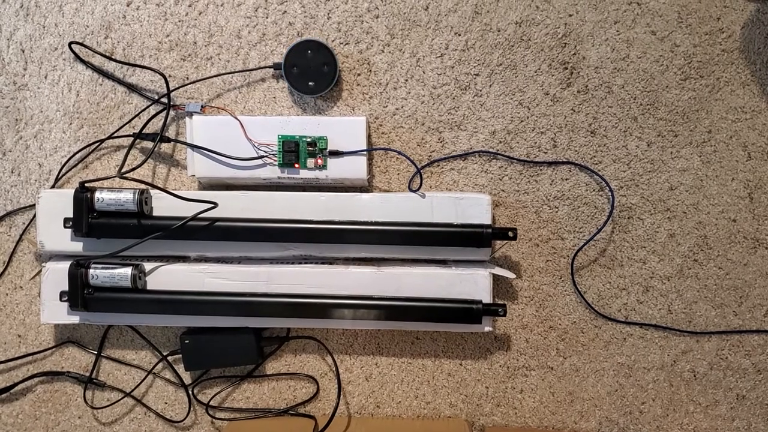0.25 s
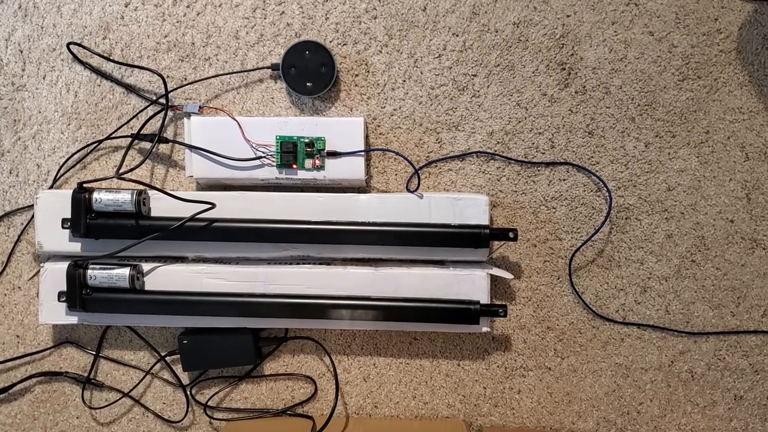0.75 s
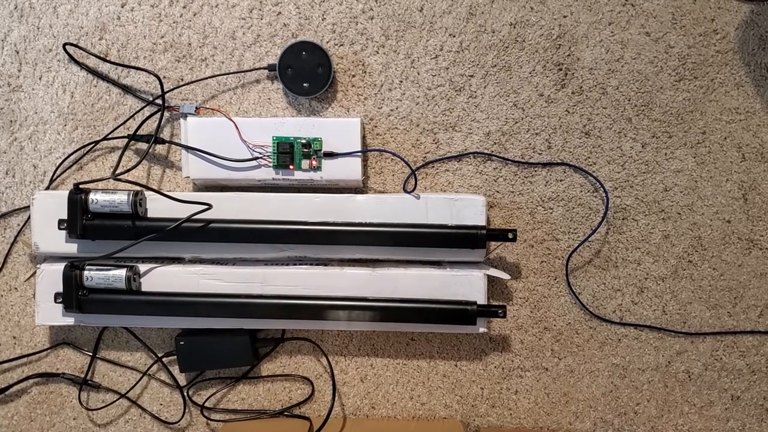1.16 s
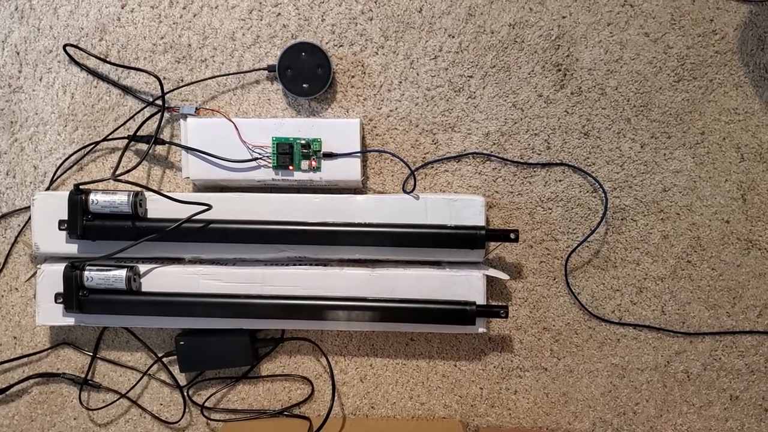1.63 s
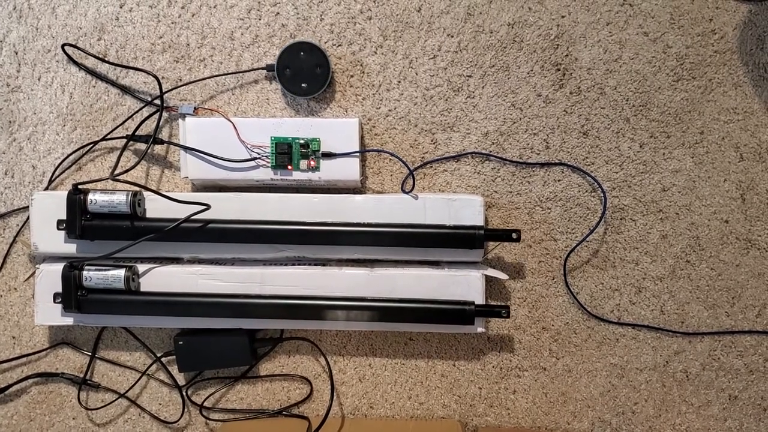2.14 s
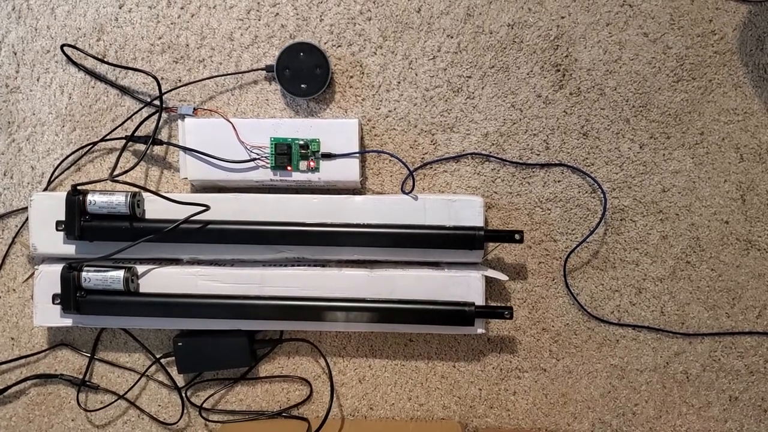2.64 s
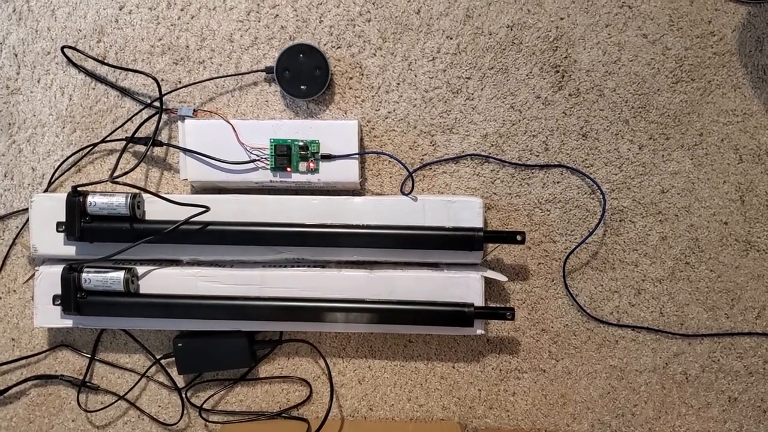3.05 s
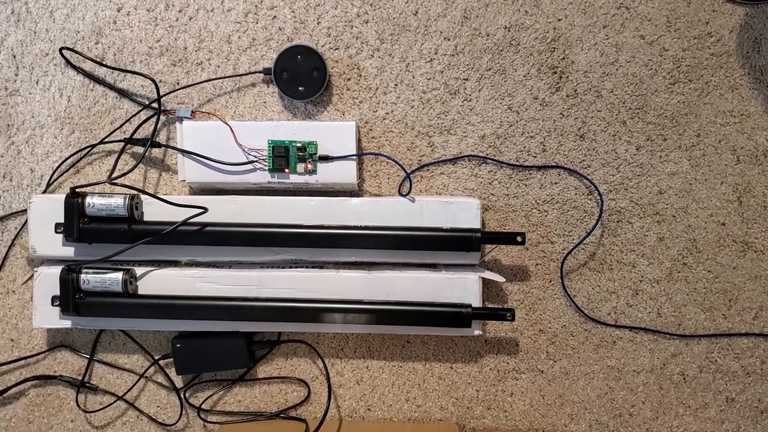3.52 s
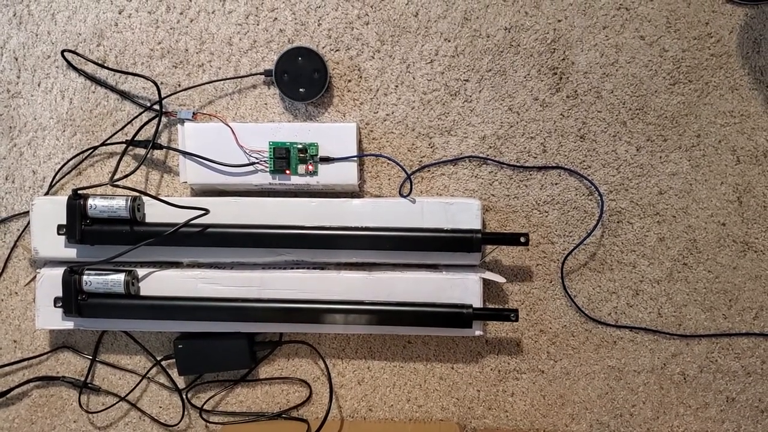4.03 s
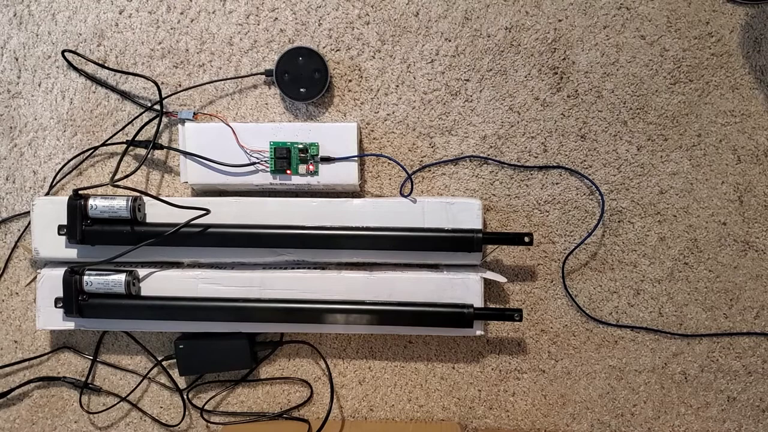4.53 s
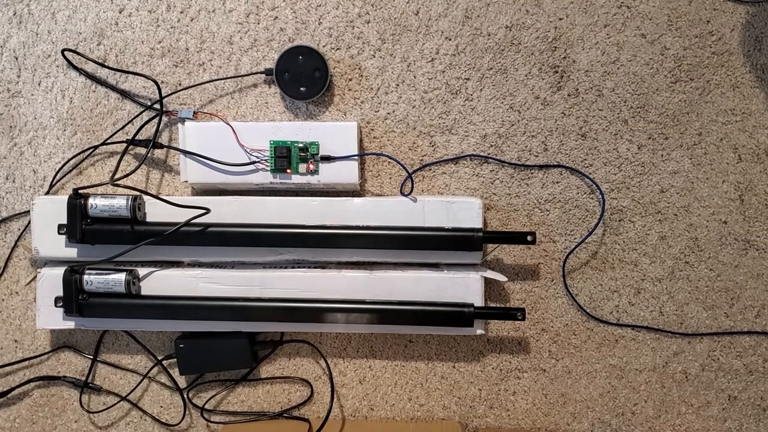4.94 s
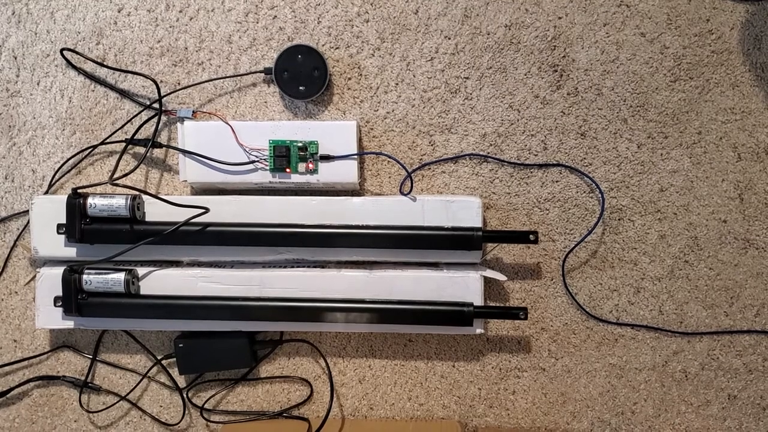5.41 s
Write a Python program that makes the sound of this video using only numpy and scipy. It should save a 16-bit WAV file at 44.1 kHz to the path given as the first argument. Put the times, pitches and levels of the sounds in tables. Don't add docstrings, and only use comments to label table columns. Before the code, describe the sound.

A continuous electric actuator whir, nasal and slightly beating, with rough gear chatter and fine brush hiss, running unbroken from start to end.

```python
import sys
import numpy as np
from scipy import signal
from scipy.fft import rfft, irfft
from scipy.io import wavfile

SR = 44100
rng = np.random.default_rng(int(sys.argv[2]) if len(sys.argv) > 2 else 0)


def level_to_linear(level):
    exponent = np.asarray(level, float) / 20
    return 10 ** exponent


def digitize_waveform(pressure):
    field = np.atleast_2d(pressure).T
    bounded = np.clip(field, -1, 1)
    quanta = np.round(bounded * 32767).astype(np.int16)
    wavfile.write(sys.argv[1], SR, quanta)


N = 250047
TIME = np.arange(N) / SR
HZ = np.arange(N // 2 + 1) * SR / N + 1e-3


def drives():
    near, far = near_gear(), far_gear()
    return mesh_song(near, far) + gearbox_rubbing(near, far) + brush_hiss(near)


# (multiple of gear speed, left level [dB], right level early [dB], right level late [dB], left lead [rad])
NEAR_TONES = [(24, -47.7, -52.1, -49, .9), (25, -32.6, -34.3, -35.3, .3), (26, -48.6, -48.9, -50.5, .2),
              (30, -46.4, -50.2, -46.4, .3), (33, -45, -47.8, -47, .1), (34, -40.7, -43.2, -41.9, .1),
              (35, -38.8, -39.2, -38.7, .4), (36, -34.1, -38.7, -35.8, .1), (37, -51.2, -53.8, -53, .1),
              (38, -50, -52, -51, .1), (48, -47.2, -43.2, -45.1, .5), (60, -37.4, -41, -53.8, .1),
              (65, -44.8, -44.4, -46.7, .6), (71, -49.2, -51.4, -51.3, .5), (74, -47.6, -47.2, -48.1, .5),
              (79, -48.3, -49.8, -57.3, -.1), (85, -49.3, -53.3, -52.8, .5), (89, -55.1, -46.1, -50.3, 1.3),
              (128, -49, -46.5, -45.3, .9), (144, -48, -37, -41, 1.2), (156, -50.8, -58, -42.9, 2),
              (163, -55.8, -47.6, -52.3, 2), (181, -56.1, -50.8, -46.9, 2.8)]
# (multiple of gear speed, left level [dB], right level [dB], left lead early [rad], left lead late [rad])
TURNING_TONES = [(84, -51.4, -38.8, 2.3, 3.4), (95, -50.7, -48.4, -.5, .2), (96, -36.2, -42, 1.3, .2),
                 (98, -58.7, -47.9, -.2, -3.1), (118, -43.3, -46.8, 2.2, 1), (119, -48.7, -51.3, 2.1, 2.8),
                 (119.833, -49, -47, 3, 5.7), (120, -34.6, -36, -2.9, -.1), (125, -52.6, -50.2, -3.1, -4.1),
                 (139, -52.6, -44.9, -2.3, .1), (142, -58.7, -46.9, .6, 1.4)]
# (multiple of gear speed, left level [dB], right level early [dB], right level late [dB], left lead [rad])
SCREW_TONES = [(24.667, -50.7, -51.2, -51.9, .4), (25.333, -49.7, -49.3, -51.5, .2),
               (26.667, -52.3, -51.9, -53.3, .4), (32.333, -50.6, -54.8, -58, .2),
               (34.167, -51, -53.4, -50.6, 0), (34.333, -52.9, -53.6, -52.6, .1),
               (35.167, -51.8, -52.1, -52.6, .4), (35.333, -47.2, -45.5, -47.5, .6),
               (36.333, -50.6, -52.3, -54.1, .1), (36.667, -49.1, -49.3, -50.4, .2),
               (83.333, -57.2, -50.5, -52.2, 2.3), (84.667, -59.1, -49.9, -50.7, -.3)]
# (multiple of gear speed, left level [dB], right level early [dB], right level late [dB], left lead [rad])
FAR_TONES = [(25.0, -41.3, -43.0, -41.1, 0.2), (26.0, -50.4, -51.6, -48.5, 0.1),
             (30.0, -54.4, -54.4, -53.2, 0.9), (48.0, -46.9, -40.4, -40.4, -0.2),
             (72.0, -54.0, -56.3, -54.1, 1.6), (105.0, -51.4, -56.0, -54.6, 0.2),
             (115.0, -49.6, -54.3, -54.3, 1.0), (120.0, -51.7, -49.4, -47.1, -0.7),
             (122.0, -49.5, -48.8, -43.2, -0.3), (125.0, -59.5, -53.3, -51.6, 0.1),
             (142.0, -65.0, -55.5, -53.3, -0.1), (178.0, -55.3, -50.4, -50.8, 3.0),
             (180.0, -51.5, -51.2, -47.6, -3.1), (205.0, -52.3, -54.3, -50.2, -2.5),
             (210.0, -61.2, -51.6, -49.5, -2.2), (240.0, -56.2, -49.3, -49.6, -1.3),
             (245.0, -57.2, -51.9, -54.8, -2.8)]


def mesh_song(near, far):
    near_start, far_start = .784, 5.1
    screw_lead = 14.246
    song = tones(near, near_start, near_meshes(), waver=.04)
    song += tones(near, near_start + screw_lead, steady_lag(SCREW_TONES), waver=.04)
    song += tones(far, far_start, steady_lag(FAR_TONES), waver=.12)
    return level_to_linear(.8) * song


def near_meshes():
    return steady_lag(NEAR_TONES) + steady_level(TURNING_TONES)


def steady_lag(table):
    return [row + row[-1:] for row in map(tuple, table)]


def steady_level(table):
    return [row[:3] + row[2:] for row in map(tuple, table)]


def tones(angle, start, table, waver):
    spread = .264
    out = np.zeros((2, N), np.float32)
    slide = np.float32(np.clip((TIME - 2.5) / .6, 0, 1))
    for k, left_db, right_db, late_right_db, lead, late_lead in np.float32(table):
        size = np.float32(np.sqrt(2) * (1 + waver * walk(10)))
        k = round(6 * k) / 6
        cycles = (k * (angle + start) + spread * k * k) / (2 * np.pi)
        phase = np.float32(2 * np.pi * (cycles - np.floor(cycles)))
        right = np.float32(level_to_linear(right_db)) + slide * np.float32(level_to_linear(late_right_db) - level_to_linear(right_db))
        out[0] += size * np.float32(level_to_linear(left_db)) * np.cos(phase)
        out[1] += size * right * np.cos(phase - lead - slide * (late_lead - lead))
    return out


# (time [s], speed [turns per s])
NEAR_SPEED = [(0, 16.8), (.3, 16.8408), (1.1, 16.8779), (1.6, 16.8557), (2.7, 16.8749), (3.5, 16.9438),
              (4.2, 16.944), (5, 16.9535), (5.67, 16.9225)]


def near_gear():
    return wobble(turns(NEAR_SPEED))


# (time [s], speed [turns per s])
FAR_SPEED = [(0, 16.9965), (.3, 16.983), (1, 17.033), (2, 17.064), (3.2, 17.088), (3.9, 17.082),
             (5, 17.085), (5.67, 17.102)]


def far_gear():
    return turns(FAR_SPEED)


def turns(speed):
    return 2 * np.pi * np.cumsum(np.interp(TIME, *np.transpose(speed))) / SR


SCREW_WOBBLE = [
    (.0075, -2.0),
    (.0116, .05),
]


def wobble(angle):
    (early, early_at), (late, late_at) = SCREW_WOBBLE
    extended = TIME / TIME[-1]
    screw = (1 - extended) * early * np.cos(angle / 6 - early_at)
    screw += extended * late * np.cos(angle / 6 - late_at)
    sway = .0051 * np.cos(angle / 13.5 + 1.77)
    return angle + screw + sway


# (frequency [Hz], left level [dB per Hz], right level [dB per Hz])
GEARBOX = [(200, -100, -103), (280, -89.5, -90), (384, -72.5, -78), (530, -61, -64), (773, -67.5, -67.5),
           (863, -74, -69.5), (940, -67.5, -73.5), (1255, -61.5, -62.5), (1780, -93, -65),
           (2230, -69.5, -59), (2610, -84, -65.5), (2940, -70.5, -63.5), (4570, -74, -68.5),
           (5940, -73, -70.5), (6640, -80, -81), (7100, -84, -84)]
# (frequency [Hz], width [Hz], left level [dB per Hz], right level [dB per Hz])
BOX_MODES = [(428.7, 24, -53.5, -56.5), (805, 17, -66, -57.5), (1418, 24, -53.5, -58.5),
             (1631, 53, -57.5, -72), (1824, 59, -64.5, -82), (1990, 78, -55, -82), (2406, 127, -67.5, -60),
             (2649, 35, -56.5, -64), (2767, 36, -76, -62), (3028, 53, -70, -57.5), (3450, 65, -65, -79),
             (3563, 100, -65, -61), (3683, 140, -68, -59), (4135, 200, -61.5, -61.5),
             (5127, 230, -66, -61.5), (5390, 110, -71.5, -66)]
# (frequency [Hz], width [Hz], left level [dB per Hz], right level [dB per Hz])
TUBE_MODE = [(575, 90, -66, -67)]
BOX_PULSE = [(1 / 6, .07), (1, .04), (2, .04), (5, .05), (6, .05), (12, .05), (36, .05), (60, .09)]


def gearbox_rubbing(near, far):
    rubbing = level_to_linear(-3) * hiss(near, BOX_PULSE, flicker_db=.5)
    return housing(ports(*(tooth_chatter(near, far) + rubbing)), GEARBOX, BOX_MODES + TUBE_MODE)


def tooth_chatter(near, far):
    meshes = near_meshes()
    chatter = level_to_linear(-9) * teeth(near, meshes, count=1)
    chatter += level_to_linear(-13) * teeth(near, meshes + steady_lag(SCREW_TONES), count=6)
    chatter += level_to_linear(-11.5) * teeth(far, FAR_TONES, count=1)
    chatter += level_to_linear(-14) * teeth(far, FAR_TONES, count=6)
    return chatter


def teeth(angle, table, count):
    size = 32768 * count
    lines = np.zeros((3, size // 2 + 1), complex)
    lines[:, 1:420 * count] = rng.standard_normal((3, 420 * count - 1, 2)) @ [1, 1j]
    sung = np.round(np.array(table)[:, 0] * count).astype(int)
    lines[:, sung] = 0
    pattern = irfft(lines, size)
    place = (angle / (2 * np.pi * count) * size).astype(int) % size
    return pattern[:, place] / pattern.std()


# (frequency [Hz], left level [dB per Hz], right level [dB per Hz])
BRUSHES = [(5000, -105, -99), (7340, -76, -81.5), (8560, -84, -79), (8460, -70, -118),
           (10100, -72.5, -72.5), (10960, -70, -73), (11740, -60, -70), (12500, -60, -64),
           (14200, -68, -76), (14900, -66.5, -65.5), (15700, -69, -71), (17000, -87, -87)]
# (frequency [Hz], width [Hz], left level [dB per Hz], right level [dB per Hz])
CAN_MODES = [(12110, 290, -67.5, -69), (12450, 296, -59, -58), (13900, 500, -63.5, -73)]
BRUSH_PULSE = [(1 / 6, .05), (1, .05), (2, .10), (7, .04), (10, .16), (14, .09), (24, .07), (36, .04),
               (60, .17), (70, .07), (84, .06)]
# (time [s], level [dB])
LOAD = [
    (0.0, -33),
    (3.8, -31.5),
    (5.67, -32),
]


def brush_hiss(near):
    lead_s = 12 / 12430
    scrape = hiss(near, BRUSH_PULSE, flicker_db=-0.64)
    can = housing(ports(*scrape, lead_s=lead_s), BRUSHES, CAN_MODES)
    effort_db = np.interp(TIME, *np.transpose(LOAD))
    return can * level_to_linear(effort_db - effort_db.mean())


def hiss(angle, pulse, flicker_db):
    beat = 1 + sum(depth * np.cos(k * angle + k * k) for k, depth in pulse)
    return rng.standard_normal((3, N)) * level_to_linear(flicker_db * walk(14)) * beat


def housing(pair, spectrum, modes):
    power = np.array([level_to_linear(along(spectrum, 1)), level_to_linear(along(spectrum, 2))]) ** 2
    for hz, width, left_db, right_db in modes:
        peak = 1 / (1 + (2 * (HZ - hz) / width) ** 2) ** 2
        power += np.outer(level_to_linear(np.array([left_db, right_db])) ** 2, peak)
    return irfft(pair * np.sqrt(power * SR / 2), N)


# (frequency [Hz], likeness [0-1])
LIKENESS = [(100, 0.66), (700, 0.85), (1300, 0.82), (2000, 0.01), (3000, 0.57), (4100, 0.32), (5100, 0.87),
            (6300, 0.02), (11200, 0.05), (11800, 0.66), (12600, 0.64), (13300, 0)]


def ports(shared, left, right, fresh=.4, lead_s=8 / 44100):
    like = np.clip(along(LIKENESS, 1), 0, 1)
    late = np.exp(-2j * np.pi * HZ * lead_s)
    shared = rfft(shared)
    own = [np.sqrt(1 - fresh) * shared * echoes(t60_s=.15) + np.sqrt(fresh) * rfft(side)
           for side in (left, right)]
    direct = shared * np.array([late ** 0, late])
    return np.sqrt(like) * direct + np.sqrt(1 - like) * np.array(own)


def echoes(t60_s):
    tail = rng.standard_normal(SR // 5) * np.exp(-np.log(1000) * TIME[:SR // 5] / t60_s)
    return rfft(tail / np.sqrt(np.sum(tail ** 2)), N)


def along(table, column):
    table = np.array(table)
    return np.interp(np.log(HZ), np.log(table[:, 0]), table[:, column])


def walk(rate):
    levels = rng.standard_normal(200)
    return 1.1 * np.interp(TIME * rate, np.arange(len(levels)), levels)


# (frequency [Hz], level [dB per Hz])
ROOM = [(20, -89), (40, -86), (75, -81), (130, -86), (250, -87), (500, -90), (16000, -110)]
# (frequency [Hz], rms level [dB])
HUM = [(60, -90), (120, -60.5), (218, -70.5)]


def room():
    air = ports(*rng.standard_normal((3, N))) * level_to_linear(along(ROOM, 1))
    air = irfft(air * np.sqrt(SR / 2), N)
    hum = sum(level_to_linear(db + 2.5 + 0.63 * walk(3.0)) * np.sin(2 * np.pi * hz * TIME) for hz, db in HUM)
    return (air + hum) * level_to_linear(np.array([[-1.1], [1.1]]))


def scene():
    return drives() + room()


def band_limit(x):
    return signal.sosfilt(signal.butter(12, 16100, fs=SR, output="sos"), x)


def record(dry):
    steep = signal.ellip(10, .3, 60, 15680, fs=SR, output="sos")
    mix = signal.sosfilt(steep, dry)
    return band_limit(mix)


dry = scene()
out = record(dry)
digitize_waveform(out)
```